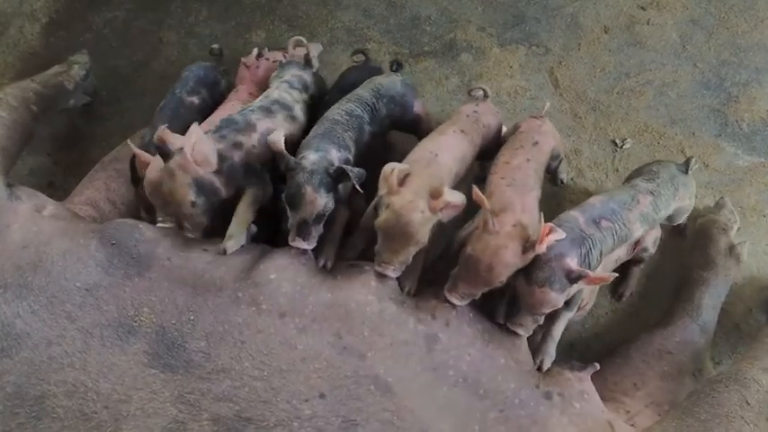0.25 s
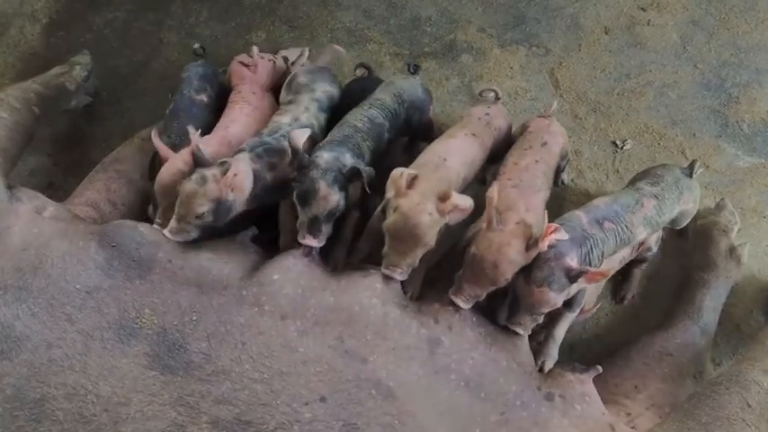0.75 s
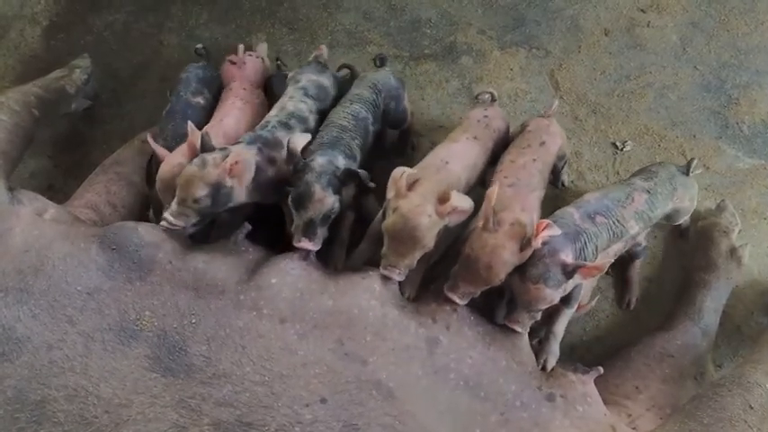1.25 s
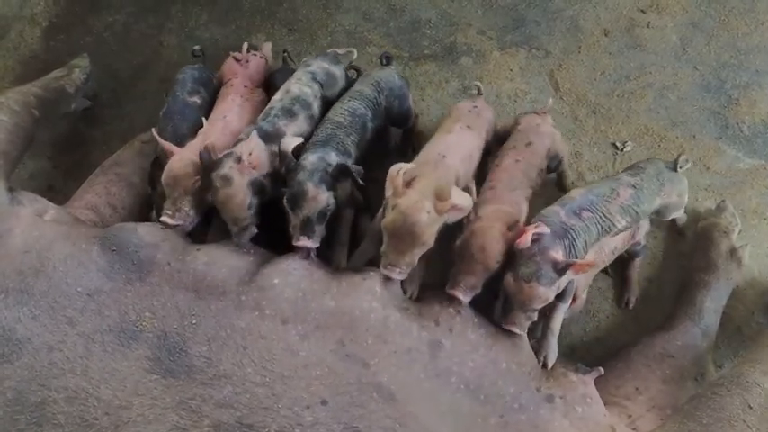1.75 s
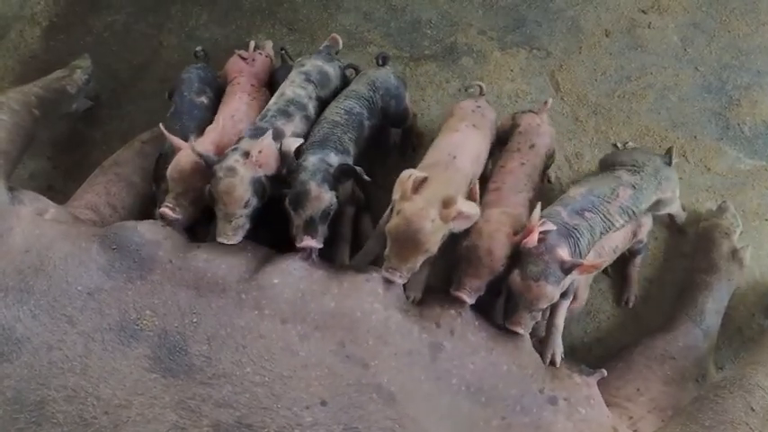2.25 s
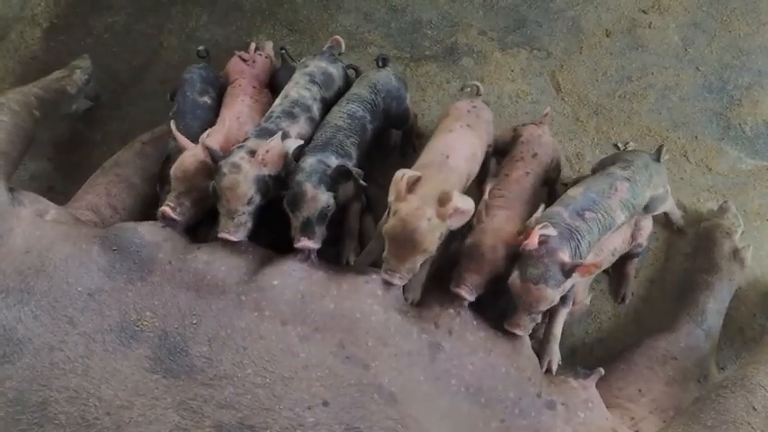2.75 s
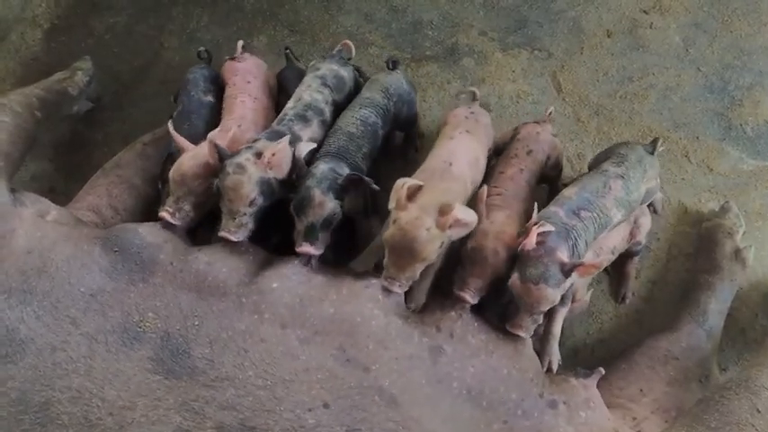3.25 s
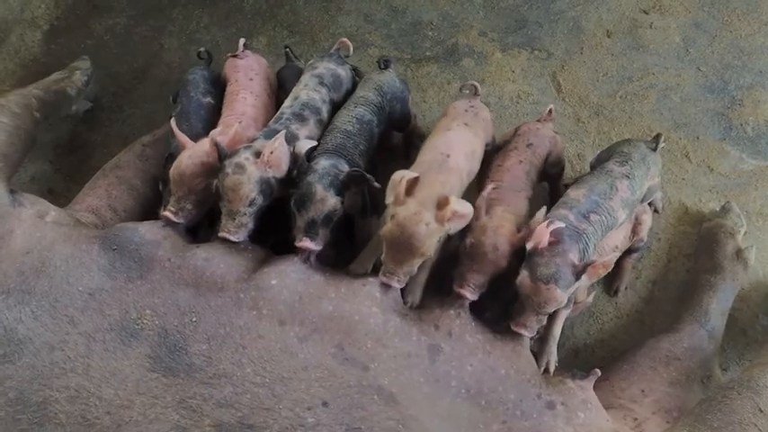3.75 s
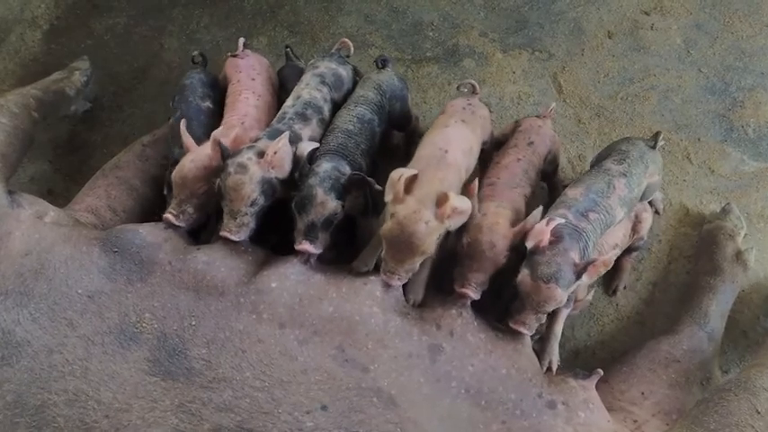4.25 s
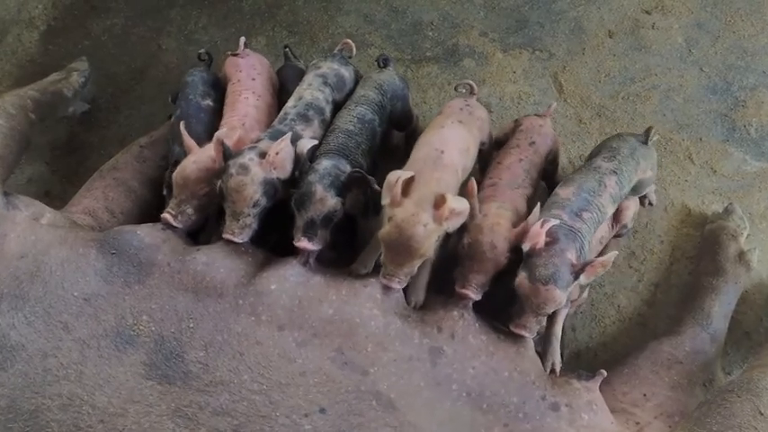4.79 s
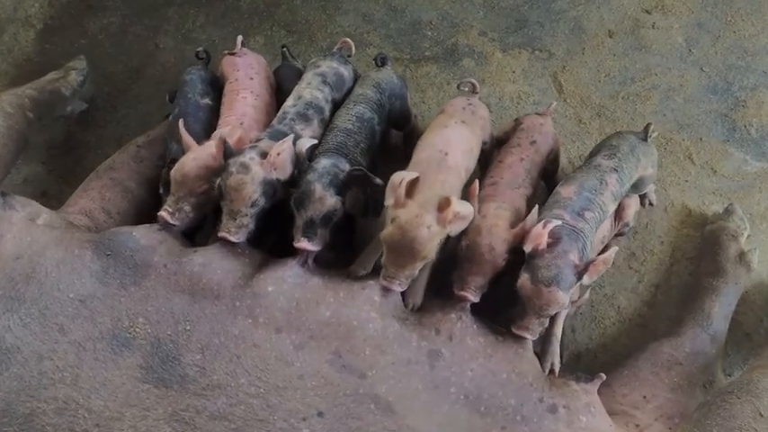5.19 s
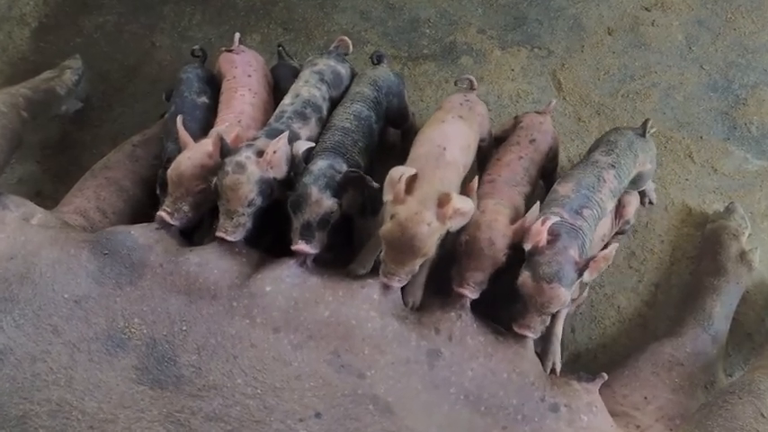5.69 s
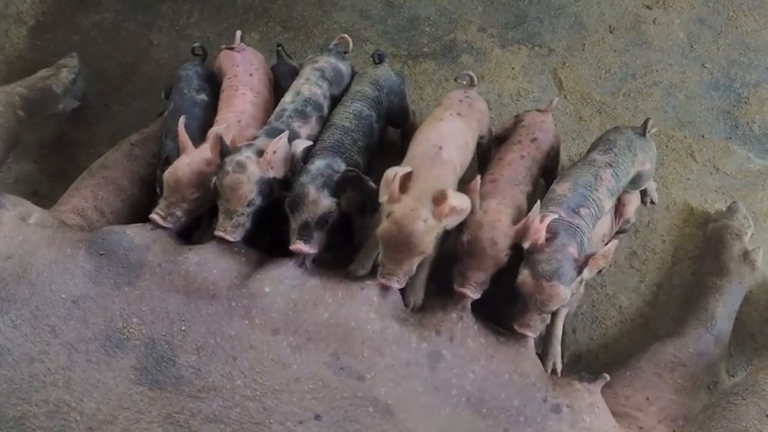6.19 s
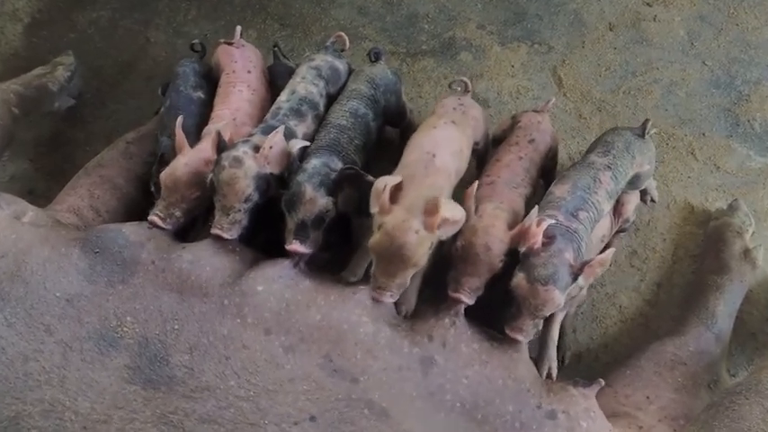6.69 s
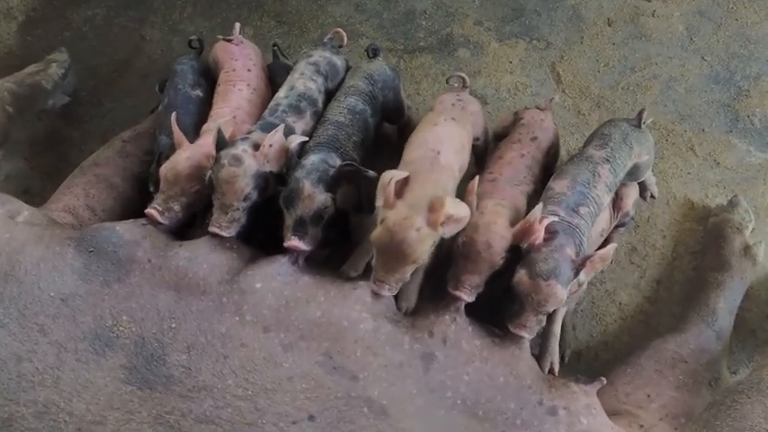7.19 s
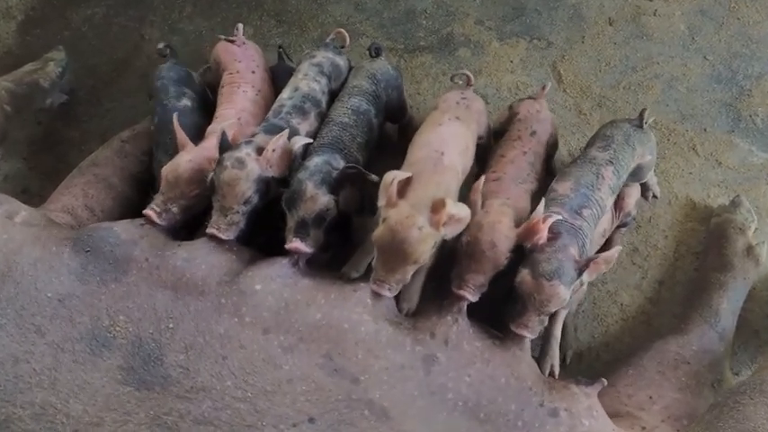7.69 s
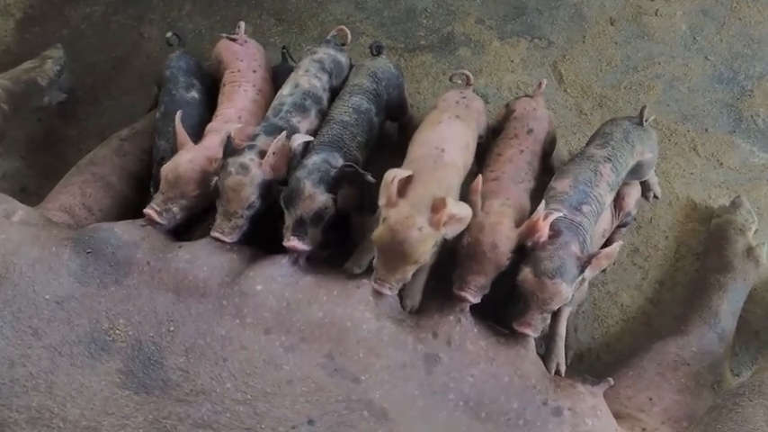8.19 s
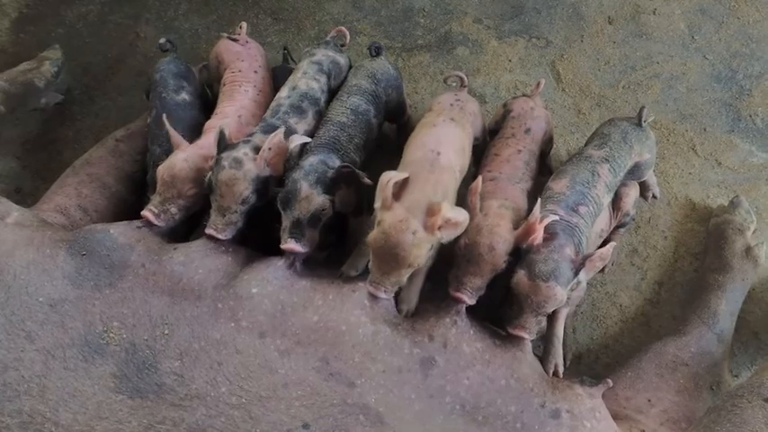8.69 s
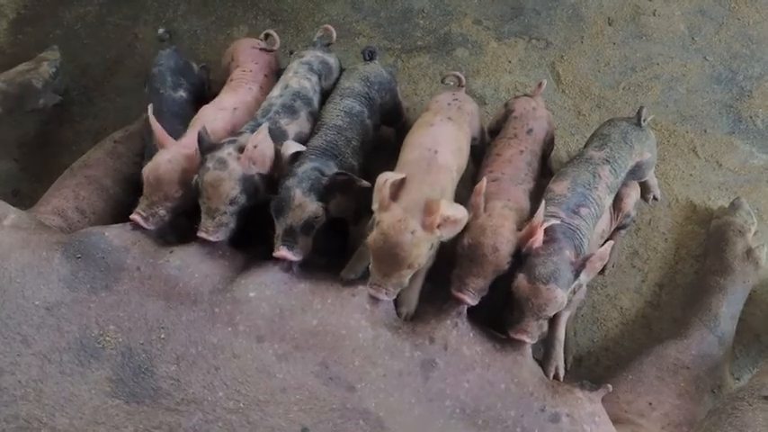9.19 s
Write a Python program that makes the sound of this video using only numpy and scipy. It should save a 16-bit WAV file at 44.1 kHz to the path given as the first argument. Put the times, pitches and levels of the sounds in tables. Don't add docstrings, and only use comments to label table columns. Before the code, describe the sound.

Close beside a sow on a concrete floor, her short, low, knocking grunts come nearly twice a second, each ending in a faint snout hiss. Piglets smack wetly about four times a second, slightly to the right, with lip pops. Small squeaks cluster at the start and one thin squeal comes just after one second. A hard shed adds a short echo over rumble, rustle and a faint cicada; phone-like stereo pickup.

```python
import sys
import numpy as np
from scipy import signal
from scipy.fft import rfft, irfft
from scipy.io import wavfile
from scipy.ndimage import uniform_filter1d

SR = 44100
rng = np.random.default_rng(int(sys.argv[2]) if len(sys.argv) > 2 else 0)


def gain_from_decibels(decibels):
    exponent = np.asarray(decibels, float) / 20
    return 10 ** exponent


def transcribe(u):
    v = np.clip(np.atleast_2d(u).T, -1, 1)
    q = np.round(v * 32767).astype(np.int16)
    wavfile.write(sys.argv[1], SR, q)


N = 416304


def evened(x):
    return x / np.sqrt(np.mean(x ** 2) + 1e-20)


def read(points, hz):
    f, value = np.transpose(points)
    return np.interp(np.log(hz + 1), np.log(f + 1), value)


def add(mix, s, sound):
    part = mix[..., round(s * SR):][..., :sound.shape[-1]]
    part += sound[..., :part.shape[-1]]


def panned(x, db):
    return x * gain_from_decibels(np.array([[db], [-db]]) / 2)


def ring(x, hz, width):
    return signal.lfilter(*signal.iirpeak(hz, hz / width, SR), x)


def knock(effort_db, *shares_db):
    # (f/Hz, width/Hz, level/dB)
    chest_modes = [(95, 60, -11), (152, 50, -6), (215, 70, -6.5), (410, 44, 1), (465, 50, -4.5),
                   (545, 55, -9), (690, 80, -15)]
    snout_modes = [(1025, 45, 1), (1480, 55, -1.5)]
    shut_modes = [(1820, 70, 0), (2150, 150, -7), (3200, 200, -9), (5300, 250, -12)]
    open_modes = [(2460, 110, 0), (2700, 200, 0), (2980, 200, -1), (3550, 300, -6), (4400, 220, -6),
                  (1620, 90, -2)]
    t = np.arange(3500) / SR
    onset = 70
    puff = rng.standard_normal(len(t)) * np.exp(-t / .013) * (t > onset / SR)
    slaps = signal.unit_impulse(len(t), onset)
    slaps[rng.integers(250, 800, 2)] = .3 * rng.standard_normal(2)
    out = 1.5 * np.exp(-((t - .0016) / .0004) ** 2 / 2)
    cavities = (chest_modes, snout_modes, shut_modes, open_modes)
    breath = (.07, .07, .09, .3)
    looseness = (1, .9, 1.2, 1.5)
    for modes, db, air, loose in zip(cavities, (-.6, *shares_db), breath, looseness):
        drive = slaps + air * puff
        part = 0
        for hz, width, mode_db in modes:
            a, b = rng.standard_normal(2)
            hz = hz * (1 + .012 * loose * b)
            steep = ring(ring(drive, hz, width), hz, 3.0 * width)
            part = part + gain_from_decibels(mode_db + 2.3 * loose * a) * evened(steep)
        out = out + gain_from_decibels(db) * part / np.sqrt(np.mean(part[:1150] ** 2))
    return gain_from_decibels(effort_db - 1) * out


def sigh(effort_db):
    level_db, t60_s, centre_hz, width_hz = -21, .45, 1700, 2400
    t = np.arange(12000) / SR
    air = evened(ring(rng.standard_normal(len(t)), centre_hz, width_hz))
    return gain_from_decibels(effort_db + level_db - 60 * t / t60_s) * np.minimum(t / .03, 1) * air


def sow():
    # (first knock t/s, gap between knocks/s, length/s, gape level/dB, closing snap level/dB)
    grunts = [(.432, .0273, .109, 1, 8), (.875, .028, .084, -5, -4), (1.542, .0285, .114, -5, -4),
              (2.046, .028, .084, 5, -1), (2.509, .029, .087, -11, 2), (3.16, .029, .087, 2, -3),
              (3.714, .0275, .082, 1.5, -3), (4.362, .029, .087, 7, -1), (4.927, .025, .075, 1.5, -.6),
              (5.465, .030, .09, -3.5, 7), (5.984, .0295, .088, 7, 1.5), (6.636, .0262, .105, 1, 9),
              (7.132, .0285, .085, -5, -1.5), (7.655, .0231, .092, 2, -3.5), (8.308, .029, .087, 8, -.6),
              (8.938, .0285, .085, .6, -5)]
    # (effort level/dB, nose level/dB, shut mouth level/dB, open mouth level/dB, share of gape [0-1])
    course = [
        (-8, -5.5, .5, -10, .1),
        (-4.2, -4, -10.5, -5.5, 1),
        (.3, -6.5, -17.5, -13.5, .6),
        (-4, -9.5, -12, -16, .1),
    ]
    first_effort_db, tiring_db_per_s = -24.5, .2
    chest_loss, nose_gain = .35, .5
    snap_ahead = .35
    muffled_s, muffle_db = (2.046, 5.984), -3
    lead_s, lead_db, trail_db = .041, -17, -16
    out = np.zeros(N)
    for start, gap, length, gape_db, snap_db in grunts:
        last = round(length / gap)
        effort_db = first_effort_db - tiring_db_per_s * start
        for k in range(last + 1):
            push, nose, shut, wide, share = course[-1 if k == last else min(k, 2)]
            snap_share = (k == last) + snap_ahead * (k == last - 1)
            more = share * gape_db + snap_db * snap_share
            push = push - chest_loss * more * (k in (1, last))
            if k == 0 and np.isclose(start, muffled_s, atol=.02).any():
                push, more = push + muffle_db, 2 * muffle_db
            thud = knock(effort_db + push, nose + nose_gain * more, shut + more, wide + more)
            add(out, start + k * gap, thud)
        add(out, start + length, sigh(effort_db))
        add(out, start - lead_s, knock(effort_db + lead_db, -12, -25, -30))
        add(out, start + (last + 1) * gap, knock(effort_db + push + trail_db, -5, -10, -12))
    return signal.sosfilt(signal.butter(6, 5700, fs=SR, output="sos"), out)


def smacks(rows, pan_db, drawl):
    # (f/Hz, level/dB per Hz)
    wet_colour = [(2940, -52), (5000, -22), (7040, -18), (9770, -8), (10600, -2), (12300, -1), (14000, -4),
                  (14500, -24), (15100, -54)]
    t60_s, rise_s, size = .1, .012, 4096
    out = np.zeros((2, N))
    t, hz = np.arange(size) / SR, np.fft.rfftfreq(size, 1 / SR)
    for s, db in rows:
        a, b, c = rng.standard_normal((3, size))
        spatter = gain_from_decibels(5.2 * evened(uniform_filter1d(c, 40)))
        build, thinning = gain_from_decibels(3200 / drawl * (t - rise_s)), gain_from_decibels(-60 * (t - rise_s) / (drawl * t60_s))
        shape = np.minimum(thinning, build)
        bumps_db = 3.2 * evened(uniform_filter1d(rng.standard_normal(len(hz)), 70))
        colour_db = np.maximum(read(wet_colour, hz), -21 - 30 * (hz < 1500)) + bumps_db
        stereo = np.array([a + .6 * b, a - .6 * b])
        ticks = irfft(rfft(stereo * spatter) * gain_from_decibels(colour_db))
        smack = gain_from_decibels(db + .4) * ticks * shape / abs(ticks.mean(0) * shape).max()
        add(out, s - rise_s, panned(smack, pan_db))
    return out


def pops():
    # (t/s, peak level/dB, ring f/Hz, t60/s, second ring f/Hz)
    lip_pops = [(.397, -33, 4300, .04, 400), (.859, -33, 7200, .03, 5500), (1.0899, -12, 2650, .007, 3900),
                (1.749, -28, 1800, .07, 5900), (2.0253, -22, 4500, .03, 8200),
                (2.6614, -36, 4400, .05, 3600), (3.327, -35, 5200, .03, 7000), (5.30, -35, 3570, .03, 7000),
                (5.5558, -26, 4440, .05, 7500), (5.8845, -31, 6400, .03, 3000),
                (6.2477, -34, 6500, .04, 4000), (7.0184, -34, 3800, .04, 6500),
                (8.0426, -38, 3040, .04, 6000), (8.064, -34, 4430, .04, 7000),
                (8.6627, -23, 6420, .06, 1300)]
    second_db = -3
    out, t = np.zeros(N), np.arange(3000) / SR
    for s, db, hz, t60, other_hz in lip_pops:
        drive = (t == 0) + .2 * rng.standard_normal(len(t)) * gain_from_decibels(-60 * t / t60)
        first, second = (evened(ring(ring(drive, f, 700), f, 1300)) for f in (hz, other_hz))
        spit = evened(ring(drive, 7000, 9000))
        sound = first + gain_from_decibels(second_db) * second + .5 * spit
        add(out, s, gain_from_decibels(db + .8) * sound / abs(sound).max())
    return out


def whistle(hz, rough, overtones_db):
    a, b = (evened(uniform_filter1d(v, 40))[:len(hz)] for v in rng.standard_normal((2, 8000)))
    phase = 2 * np.pi * np.cumsum(hz * (1 + .09 * rough * a)) / SR
    tone = 0
    for k, db in enumerate(overtones_db, 1):
        tone = tone + gain_from_decibels(db) * np.sin(k * phase) * (k * hz < 14500)
    return evened(tone * (1 + rough * b))


def squeaks():
    # (t/s, length/s, first f/Hz, last f/Hz, level/dB)
    clear_squeaks = [(.305, .04, 1600, 1830, -36), (.305, .04, 3150, 3600, -38),
                     (.975, .045, 1750, 1750, -42), (.985, .04, 4150, 3600, -35),
                     (1.26, .08, 480, 500, -42), (2.79, .055, 740, 760, -44), (4.8, .06, 690, 700, -48),
                     (7.44, .04, 600, 600, -48), (7.44, .17, 1150, 1330, -52)]
    hoarse_squeaks = [(.058, .02, 4500, 4000, -46), (.06, .035, 3300, 2300, -40), (.2, .11, 480, 720, -43),
                      (.27, .05, 1500, 1750, -46), (.71, .045, 560, 620, -42), (1.26, .07, 3300, 3500, -36),
                      (1.66, .09, 6800, 6600, -44)]
    rasping_squeaks = [(1.64, .11, 1400, 1700, -40), (2.76, .09, 1300, 1700, -48),
                       (5.0, .09, 1200, 1500, -43)]
    out = np.zeros(N)
    for rows, rough in ((clear_squeaks, .5), (hoarse_squeaks, 1.1), (rasping_squeaks, 2.5)):
        for s, length, first_hz, last_hz, db in rows:
            hz = np.linspace(first_hz, last_hz, round(length * SR))
            tone = whistle(hz, rough, (0, -8 - hz[0] / 300, -14 - hz[0] / 300))
            add(out, s, gain_from_decibels(db) * tone * signal.windows.tukey(len(hz), .6))
    return out


def creak():
    # (t/s, clicks [count], gap/s, f/Hz, width/Hz, level/dB)
    s, clicks, gap, hz, width, db = (.948, 6, .0125, 7000, 700, -25)
    t = np.arange(5000) / SR
    breath = rng.standard_normal(len(t)) * np.exp(-(t % gap) / .003) * (t < clicks * gap)
    rattle = ring(breath, hz, width)
    out = np.zeros(N)
    add(out, s, gain_from_decibels(db) * rattle / abs(rattle).max())
    return out


def squeal():
    # (t/s, f/Hz, level/dB)
    low_path = [(1.255, 3200, -42), (1.28, 3750, -30), (1.305, 3700, -29), (1.335, 3920, -31),
                (1.365, 3700, -29), (1.38, 3000, -38), (1.395, 1900, -48)]
    high_path = [(1.243, 4000, -40), (1.252, 5600, -33), (1.275, 6400, -26), (1.305, 7200, -26),
                 (1.325, 7700, -33)]
    voices = ((low_path, .14, (0, -3, -18), .25), (high_path, .33, (0, -9), .6))
    out = np.zeros(N)
    for rows, rough, overtones_db, throb in voices:
        s, hz, db = np.transpose(rows)
        t = np.arange(s[0], s[-1], 1 / SR)
        beat = 1 + throb * np.cos(2 * np.pi * 230 * t)
        tone = whistle(np.interp(t, s, hz), rough, overtones_db) * beat
        add(out, s[0], gain_from_decibels(np.interp(t, s, db)) * tone * signal.windows.tukey(len(t), .1))
    return out


def shed(x, apart):
    # (f/Hz, t60/s)
    wall_decay = [(100, .2), (500, .17), (2000, .2), (6000, .18), (14000, .12)]
    taps = np.zeros((2, SR // 2))
    grid = np.arange(300, SR // 2 - 20, 20)
    at = grid + rng.integers(0, 20, (2, len(grid)))
    np.put_along_axis(taps, at, rng.choice([-1., 1.], at.shape), 1)
    taps = np.array([taps[0] + apart * taps[1], taps[0] - apart * taps[1]])
    hz, t, z = signal.stft(taps, SR, nperseg=256)
    tail = signal.istft(z * gain_from_decibels(-60 * t / read(wall_decay, hz)[:, None]), SR, nperseg=256)[1]
    return signal.oaconvolve(x[None], tail / np.linalg.norm(tail[0]), axes=1)[:, :N]


def yard():
    # (f/Hz, level/dB per Hz)
    yard_colour = [(12, -32), (20, -5), (72, 1.5), (164, -6), (459, -10), (844, -10), (2170, -17),
                   (3670, -17), (5720, -20), (7330, -19), (7970, -17.5), (8660, -18), (11800, -17),
                   (13900, -20), (15100, -48)]
    # (f/Hz, likeness [0-1])
    likeness = [(30, .86), (80, .96), (500, .94), (2000, .68), (5000, .38), (12000, .4)]
    # (t/s, stir level/dB)
    litter_stir = [(0, -1), (.47, 3), (.73, -2), (1.13, 5), (1.31, 1.5), (1.55, 3), (1.84, -2), (2.6, 1.5),
                   (3.52, -3), (4.86, .7), (7.3, -1), (7.78, 1.2), (8.4, -.5), (9.44, -2.5)]
    level_db = -46
    high_follow, settle_db, settle_s = .8, 4, 2.5
    frames, hz = N // 256 + 5, np.fft.rfftfreq(1024, 1 / SR)
    a, b, c, d, patches = rng.standard_normal((frames, 513, 5)).T
    patches = evened(uniform_filter1d(uniform_filter1d(patches, 10, 0), 10, 1))
    patch_depth = (.4 + .6 * np.clip(hz / 500, 0, 1))[:, None]
    t = np.arange(frames) * 256 / SR
    low = np.interp(t, *np.transpose(litter_stir))
    high = high_follow * low + settle_db * np.exp(-(t / settle_s) ** 2)
    high_share, reach = (np.clip(np.log2((hz + 1) / f), 0, 1)[:, None] for f in (1700, 75))
    swell_db = reach * ((1 - high_share) * low + high_share * high)
    same = np.clip(read(likeness, hz), -1, 1)[:, None]
    left = a + 1j * b
    right = same * left + np.sqrt(1 - same ** 2) * (c + 1j * d)
    z = np.array([left, right])
    z *= gain_from_decibels(read(yard_colour, hz)[:, None] + 2.2 * patches * patch_depth + swell_db)
    return gain_from_decibels(level_db + 2.5) * evened(signal.istft(z, nperseg=1024, noverlap=768)[1][:, :N])


def cicada():
    # (t/s, level/dB)
    song = [(0, -62), (2.7, -62), (3.2, -55), (4.6, -55), (4.9, -59), (5.6, -56), (9.44, -56)]
    s, db = np.transpose(song)
    a, b = evened(ring(ring(rng.standard_normal((2, N)), 8100, 330), 8100, 330))
    return gain_from_decibels(np.interp(np.arange(N) / SR, s, db) - 1.4) * np.array([a, .6 * a + .8 * b])


def scene():
    # (t/s,
    # peak level/dB)
    steady_sucks = [(.6095, -15), (1.271, -19), (1.5105, -14), (1.7454, -18), (1.9589, -23), (2.1894, -21),
                    (2.435, -17), (2.6633, -20), (2.9028, -21), (3.1497, -23), (3.3947, -22), (3.6441, -19),
                    (3.8876, -29), (4.3735, -22), (4.6294, -24), (4.8758, -20), (5.1233, -17),
                    (5.3612, -18), (5.6126, -21), (5.8237, -30), (6.113, -19), (6.3664, -22), (6.6064, -22),
                    (6.8453, -23), (7.1038, -22), (7.5597, -23), (7.8291, -26), (8.0691, -24), (8.575, -24),
                    (8.8383, -18)]
    other_sucks = [(.0638, -25), (.1341, -31), (.3985, -28), (.9178, -25), (1.0445, -26), (1.0899, -19),
                   (2.0243, -24), (2.2583, -28), (2.354, -29), (3.054, -23), (3.0984, -34), (3.3104, -37),
                   (4.145, -33), (5.2994, -32), (5.5248, -33), (6.0541, -29), (6.2482, -31), (6.4343, -31),
                   (6.559, -26), (7.0219, -19), (7.1906, -22), (7.2634, -29), (7.5028, -38), (7.9189, -25),
                   (8.2337, -34), (8.313, -30), (8.6632, -21), (8.9141, -29), (9.09, -34), (9.3142, -29)]
    mother = sow()
    sucking = smacks(steady_sucks, pan_db=-4.2, drawl=1.2) + smacks(other_sucks, pan_db=-2.2, drawl=.65)
    litter = pops() + squeaks() + creak() + squeal()
    echo = shed(gain_from_decibels(-10) * mother, .23) + shed(gain_from_decibels(-8) * litter + gain_from_decibels(-10) * sucking.mean(0), .6)
    return panned(mother, -.2) + panned(litter, -.9) + sucking + echo + yard() + cicada()


def top_cut(x):
    return signal.sosfilt(signal.butter(12, 15230, fs=SR, output="sos"), x)


def record(dry):
    edge = signal.firwin(255, 14350, window=("kaiser", 5), fs=SR)
    return top_cut(signal.oaconvolve(dry, edge[None], "same"))


dry = scene()
out = record(dry)
transcribe(out)
```